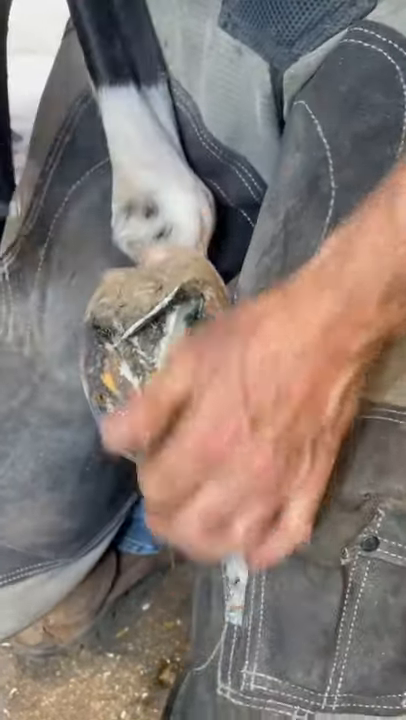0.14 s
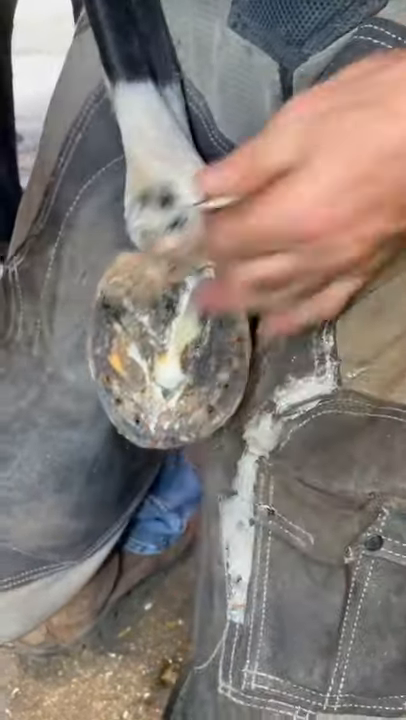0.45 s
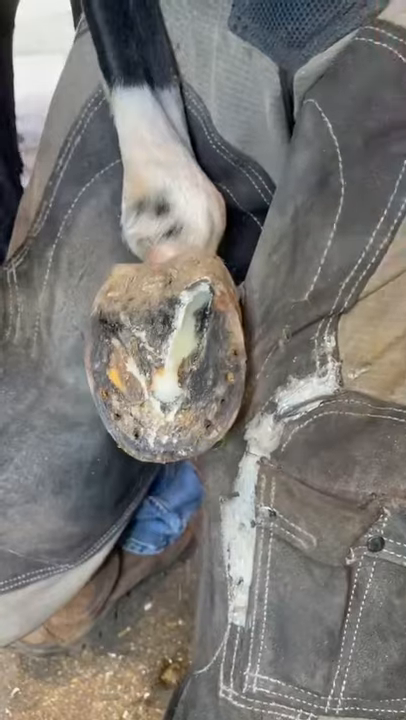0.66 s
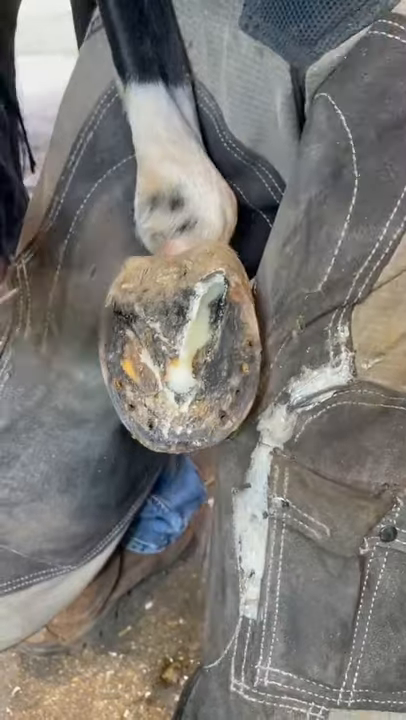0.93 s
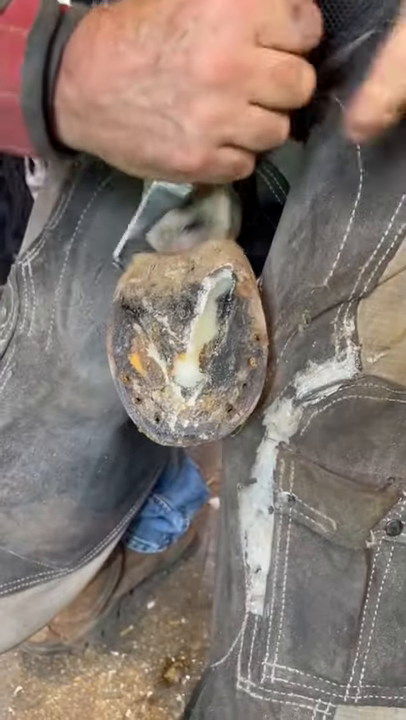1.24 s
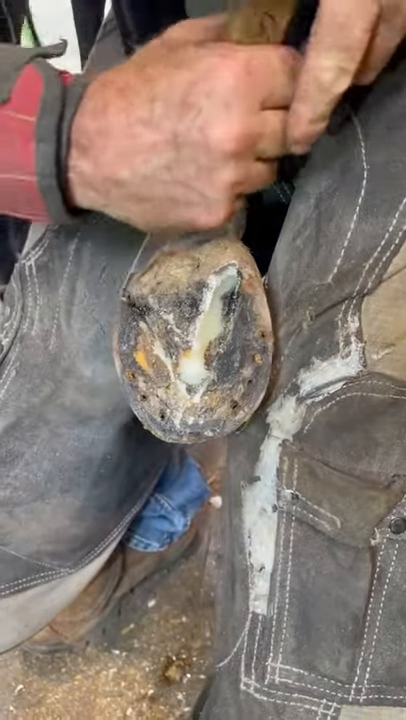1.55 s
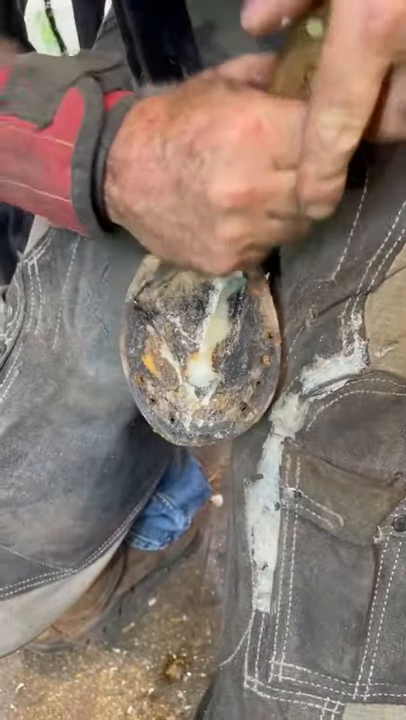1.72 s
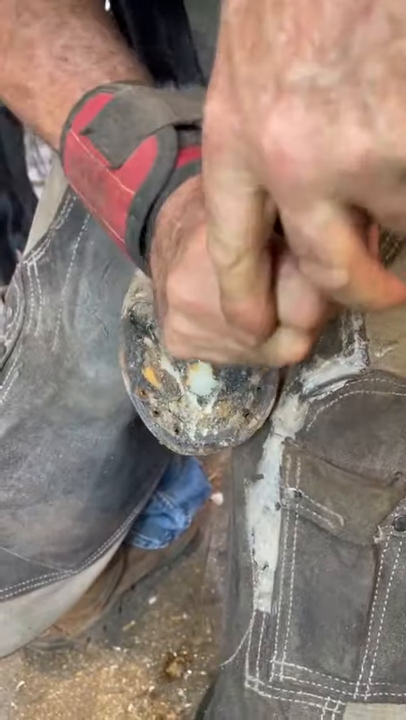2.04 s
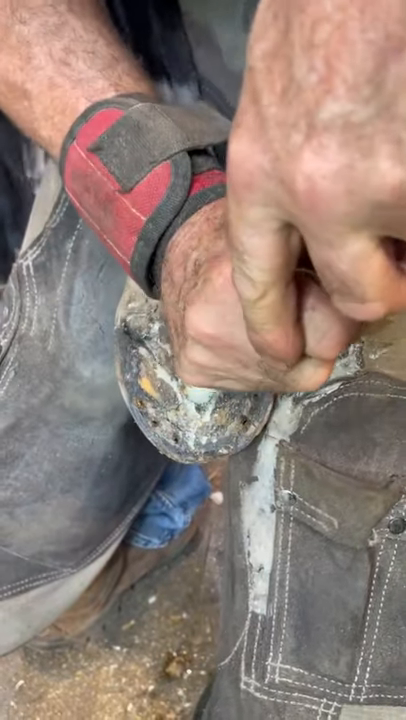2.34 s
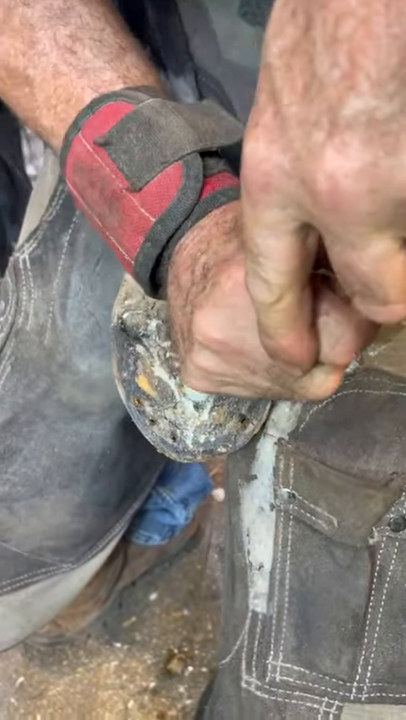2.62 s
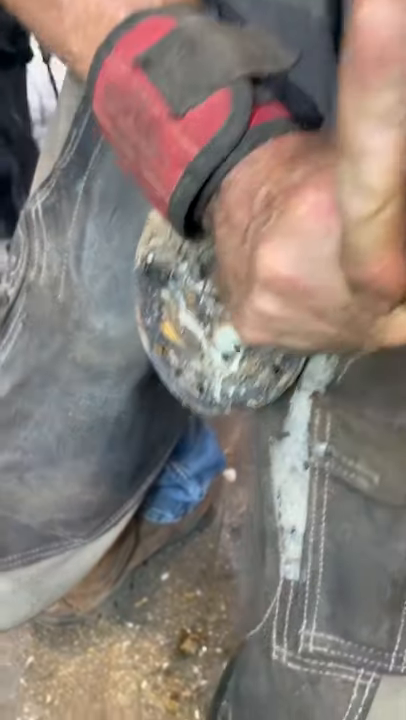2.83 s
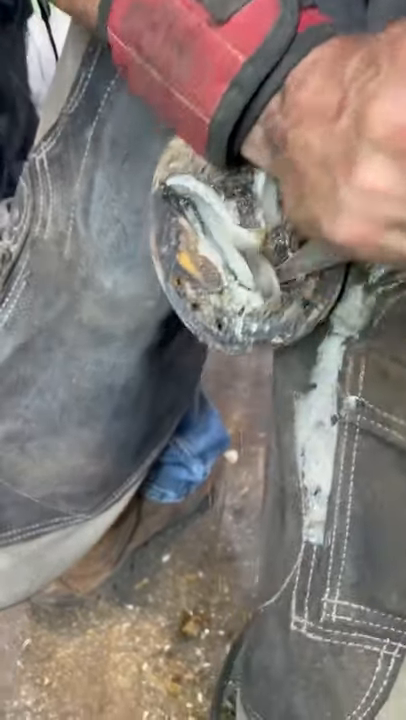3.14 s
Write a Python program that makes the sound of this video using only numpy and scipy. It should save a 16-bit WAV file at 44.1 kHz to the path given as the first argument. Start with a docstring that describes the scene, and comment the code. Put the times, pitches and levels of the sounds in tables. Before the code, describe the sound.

A knife faintly scrapes a horse's hoof over the steady hum of a fan.

```python
"""A barn with a fan running, where a hoof knife pares a horse's hoof close by. The fan hums on its motor orders
over a steady rush. Two faint thin tones hold steady high above everything. Its draught buffets the microphones
in soft low bumps; there is also one brief knock. Now and then the blade scrapes the horn in gritty strokes and
slips, ringing blade and horn briefly."""
import sys
import numpy as np
from scipy.fft import rfft, irfft, next_fast_len
from scipy.io import wavfile
from scipy.ndimage import uniform_filter1d, map_coordinates

SR = 44100
rng = np.random.default_rng(int(sys.argv[2]) if len(sys.argv) > 2 else 0)


def inscribe(sig):
    """Save sig as 16-bit PCM at rate SR to the path in sys.argv[1].

    A 1-D sig is mono; a 2-D sig holds one channel per row.
    Samples are clipped to [-1, 1] before scaling.
    """
    pcm = np.round(np.clip(np.atleast_2d(sig).T, -1, 1) * 32767)
    wavfile.write(sys.argv[1], SR, pcm.astype(np.int16))


N = 144648
T = np.arange(N) / SR

# steady background rush, with a narrow gap near 9 kHz: f/Hz, relative density/dB
RUSH_SPECTRUM = [(30, -40), (100, -1.5), (200, -3), (280, 0), (420, -4.5), (470, -9.5), (850, -8.5),
                 (1000, -10.5), (2560, -15), (4000, -22.5), (4750, -23), (4900, -36), (5050, -23.5),
                 (7900, -26), (8500, -31), (8750, -53), (9700, -48), (10000, -25.5), (11300, -25.5),
                 (11500, -36), (12000, -33), (12150, -68), (16000, -100)]
# its stereo width: f/Hz, side over mid/dB
RUSH_WIDTH = [(110, -60), (180, -48), (300, -16.5), (400, -12.5), (640, -8.5), (1170, -8), (1500, -11),
              (1900, -18), (2300, -11), (3820, -5), (8000, -7.5), (8700, -18), (9700, -20), (10000, -5),
              (11500, -7), (11900, -14)]
# weaker motor orders: order, level/dB, waver/dB
HUM_ORDERS = [(1, -50, 6), (3, -52.5, 4.5), (5, -50, 4.5), (6, -51.5, 2), (7, -54.5, 5), (9, -58.5, 1.5),
              (11, -62, 5), (13, -61, 2)]
# strongest orders, before DRONE_GAIN_DB: t/s, order 2 level/dB, order 4 level/dB
DRONE_LEVELS = [(0.0, -50, -48.5), (0.15, -48.5, -45.5), (0.41, -46, -45), (0.59, -43.5, -49.5),
                (0.88, -49.5, -46.5), (1.34, -42, -49.5), (1.47, -39, -48), (1.74, -37.5, -48.5),
                (1.88, -38, -46.5), (2.16, -39.5, -40.5), (2.27, -44.5, -42.5), (2.47, -45, -42.5),
                (2.97, -42, -41), (3.28, -54, -49)]
# thin tones: f/Hz, level before panning/dB, end/s
WHINE_TONES = [(9819, -68.5, 3.3), (8441, -68, .75)]
# turbulence envelope: t/s, level/dB
DRAUGHT_LEVELS = [(0.0, -66), (0.32, -64), (0.5, -54), (0.71, -49), (0.86, -44), (0.94, -37), (1.07, -44),
                  (1.17, -50), (1.3, -52), (1.45, -50), (1.64, -54), (1.97, -34), (2.28, -45), (2.54, -43),
                  (2.71, -42), (3.11, -34), (3.22, -41), (3.28, -36)]
# turbulence spectrum: f/Hz, relative density/dB
BUFFET_SPECTRUM = [(15, -42), (30, 11), (60, 8), (120, 2), (200, -9), (350, -19), (600, -82), (1500, -120)]
# soft low bumps and one brief knock (near 0.97 s): t/s, peak/dB, f/Hz, half-height width/s
BUMPS_AND_KNOCK = [(0.717, -26, 65, 0.012), (0.746, -22, 70.5, 0.018), (.742, -32, 190, 0.012),
                   (0.767, -24, 74.5, 0.019), (0.899, -21.5, 101, 0.016), (0.922, -20.5, 113, 0.021),
                   (0.967, -32, 359, 0.021), (.97, -33.5, 503, 0.0067), (1.054, -31.5, 75, 0.016),
                   (1.084, -25.5, 120, 0.012), (1.1, -34, 200, 0.0086), (1.114, -23, 73, 0.023),
                   (1.322, -28, 85, 0.012), (1.34, -33, 65, 0.013), (1.396, -35, 95, 0.012),
                   (1.415, -34, 65, .016), (1.44, -43, 60, 0.019), (1.846, -23.5, 58, 0.037),
                   (1.909, -24.5, 116, 0.015), (1.98, -24.5, 109, 0.015), (1.975, -34, 203, 0.043),
                   (2.034, -30, 90, 0.012), (2.108, -28.5, 86, 0.017), (2.256, -30, 80, 0.012),
                   (2.596, -25, 75, 0.012), (2.635, -30, 79.4, 0.011), (2.667, -29, 85.5, 0.026),
                   (2.739, -24, 99, 0.014), (2.788, -28, 104, 0.025), (2.815, -31.5, 113, 0.034),
                   (2.857, -32, 47.6, 0.038), (2.998, -24.5, 138, 0.034), (3.02, -21.5, 149, 0.012),
                   (3.036, -18, 188, 0.014), (3.047, -21.5, 280, 0.011), (3.057, -13, 79.5, 0.01),
                   (3.074, -21, 55, .014), (3.102, -20, 72, 0.026), (3.141, -27.5, 69, 0.036),
                   (3.157, -22, 124, 0.039), (3.195, -22, 79.4, 0.018), (3.24, -24.5, 75, 0.015)]
# ragged edge of a bump: f/Hz, relative density/dB
PUFF_SPECTRUM = [(30, -42), (100, 3), (200, -7), (330, -13.5), (600, -24), (1500, -120)]
# spells of unequal air at the two microphone ports: start/s, end/s, side gain/dB
PORT_SPELLS = [(.66, 0.842, -18), (1.761, 2.126, -9.5), (2.195, 2.62, -15), (2.622, 2.997, -12),
               (3.014, 3.3, -5.5)]
# air unequal between the ports: f/Hz, relative density/dB
PORT_SPECTRUM = [(15, -40), (35, -10), (60, 4), (130, 0.5), (240, -11.5), (400, -18), (600, -40),
                 (1500, -120)]
# knife strokes: t/s, half-height width/s, level/dB, tilt/(dB/oct), horn resonance/Hz, lift/dB
STROKES = [(.4342, .0025, -39, .5, 13500, 12), (.455, .05, -50, 1.5, 6800, 3), (.83, .05, -63, 1, 10500, 4),
           (1.84, .012, -47, 1, 8000, 6), (1.852, .034, -45, -1, 4400, 6), (1.854, .012, -46, -1, 2700, 8),
           (2.69, .04, -50, -5, 1400, 10), (2.72, .05, -63, 0, 9000, 5), (2.875, .03, -52, -3, 2400, 8),
           (2.9, .04, -46, -3, 1300, 16), (2.906, .012, -47, 3, 11000, 4), (2.926, .026, -44, 0, 6200, 9),
           (2.93, .025, -45, -3, 1400, 14), (2.947, .02, -50, -3, 1800, 12),
           (3.189, .01, -49, -1, 3300, 10), (3.201, .018, -41, -1, 3400, 12),
           (3.199, .016, -43, -3, 1950, 12), (3.217, .016, -46, -2, 3000, 6), (3.23, .018, -45, 0, 6900, 3),
           (3.23, .016, -41, -3, 2300, 6)]
# horn grit spectrum: f/Hz, relative density/dB
GRIT_SPECTRUM = [(200, -40), (500, -27), (1200, -3.5), (3000, -3), (5000, -7), (7000, -4), (9000, -9.5),
                 (11000, -2), (12500, -18), (13500, -25), (15500, -38)]
# blade slips: t/s, gain/dB, favoured f/Hz, pitch factor, ring time factor
BLADE_SLIPS = [(0.4334, -19, 2800, 1.08, 0.38), (1.8466, -29, 1300, .99, 0.97),
               (1.8458, -23, 4600, 1.01, 1.2), (1.8515, -25, 2820, 1, 0.98),
               (1.8528, -30.5, 1300, 0.92, 0.86), (1.858, -29.5, 1300, 1.03, .8),
               (2.907, -32, 1300, 0.84, 0.76), (2.917, -31, 1300, 1.04, 0.69),
               (2.9212, -30, 1300, 0.94, 0.64), (2.925, -33, 1300, 1.07, .6), (2.928, -27, 1300, 0.96, .8),
               (2.935, -27.5, 1300, 1.13, 0.75), (2.943, -35, 1300, 1.2, .6),
               (3.194, -23.5, 3400, 1.04, 0.78), (3.1945, -25, 2200, 0.88, 1), (3.2, -27, 2200, 0.9, 0.77),
               (3.207, -28, 3400, 1, .6), (3.2245, -27, 2870, 1.02, .8), (3.226, -33.5, 1310, 1.14, .8),
               (3.227, -30, 6850, 1, 1), (3.2335, -31, 1300, 1.15, 0.55)]
# nominal modes of blade and horn: f/Hz, level/dB, t60/s
BLADE_MODES = [(1290, 2, 0.018), (2170, -7, 0.014), (2870, -6, 0.012), (3400, -4.5, 0.017),
               (4370, -5, 0.0075), (5100, -6, 0.0069), (6850, -9, .009), (8360, -9, 0.0071),
               (10900, -18, .004)]

RUSH_DB = -41.5
SHAFT_HZ, DRONE_GAIN_DB = 59.14, 2
PUFF_DB = -12.5  # rms re bump envelope
GRAINS_PER_S, RESONANCE_OCT = 9000, 0.25
SIDE_LAG_S, SIDE_DB = 0.021, -9.5
FAVOUR_DB_PER_OCT, ATTACK_S = 20, 0.0006
RASP_DEPTH, RASP_PER_S = 0.25, 1500
LOW_HZ, TOP_HZ = 39.7, 15650


def amp(db):
    return 10 ** (np.asarray(db) / 20)


def unit_rms(x):
    return x / np.sqrt(np.mean(x ** 2) + 1e-20)


def db_at(points, hz):
    """Interpolate (f/Hz, level/dB) points over log frequency."""
    f, db = np.transpose(points)
    return np.interp(np.log(hz + 1), np.log(f + 1), db)


def curves(rows):
    """One value per sample for each column after the time."""
    times_s, *columns = np.transpose(rows)
    return [np.interp(T, times_s, column) for column in columns]


def wobble(knots_per_s):
    """Smooth random curve, rms near 1."""
    return map_coordinates(rng.standard_normal(int(N * knots_per_s / SR) + 4), [T * knots_per_s])


def pulse(at_s, width_s):
    """Gaussian envelope, width_s wide at half height."""
    return np.exp(-np.log(2) * (2 * (T - at_s) / width_s) ** 2)


def filtered(x, gain_at_hz):
    size = next_fast_len(N + SR // 2)
    return irfft(rfft(x, size) * gain_at_hz(np.fft.rfftfreq(size, 1 / SR)), size)[..., :N]


def noise(spectrum):
    return unit_rms(filtered(rng.standard_normal(N), lambda hz: amp(db_at(spectrum, hz))))


def stereo(mid, side):
    return np.array([mid + side, mid - side])


def rush():
    """Steady background noise, near mono in the bass, wider above."""
    white = rng.standard_normal((2, N))
    mid = filtered(white[0], lambda hz: amp(db_at(RUSH_SPECTRUM, hz)))
    side = filtered(white[1], lambda hz: amp(db_at(RUSH_SPECTRUM, hz) + db_at(RUSH_WIDTH, hz)))
    flutter_db = 0.3 * wobble(5) + 0.4 * wobble(25)
    return amp(RUSH_DB + flutter_db) * stereo(mid, side) / mid.std()


def fan_motor():
    """Orders of a slightly unsteady shaft, each wavering in level and phase."""
    turns = np.cumsum(SHAFT_HZ + 0.15 * wobble(2.978)) / SR

    def tone(order, db, jitter_rad):
        phase = 2 * np.pi * order * turns + jitter_rad * wobble(12) + 7 * rng.random()
        return np.sqrt(2) * amp(db) * np.sin(phase)

    hum = sum(tone(order, db + waver_db * wobble(9), jitter_rad=0.24 * order)
              for order, db, waver_db in HUM_ORDERS)
    second_db, fourth_db = curves(DRONE_LEVELS)
    second = tone(2, second_db + 0.5 * wobble(9.54), jitter_rad=0.91)
    fourth = tone(4, fourth_db + 2 * wobble(7.99), jitter_rad=0.4)
    return hum + amp(DRONE_GAIN_DB) * (second + fourth)


def whines():
    """Thin steady tones, each fading over the 20 ms before its end."""
    return sum(np.sqrt(2) * amp(db) * np.clip((end_s - T) / 0.02, 0, 1) * np.sin(2 * np.pi * hz * T)
               for hz, db, end_s in WHINE_TONES)


def draught_and_knock():
    """Low turbulence, at times unequal at the two ports, with soft low bumps and one brief knock."""
    level = amp(curves(DRAUGHT_LEVELS)[0])
    buffet = level * unit_rms(amp(3 * wobble(20)) * noise(BUFFET_SPECTRUM))
    bumps, swell = np.zeros((2, N))
    for at_s, db, hz, width_s in BUMPS_AND_KNOCK:
        envelope = amp(db) * pulse(at_s, width_s)
        bumps += envelope * np.sin(2 * np.pi * (hz * (T - at_s) + rng.random()))
        swell += envelope
    puffs = amp(PUFF_DB) * swell * noise(PUFF_SPECTRUM)
    spells = sum(amp(db) * ((T > start_s) & (T <= end_s)) for start_s, end_s, db in PORT_SPELLS)
    side = uniform_filter1d(spells, size=900) * (level + 0.23 * swell) * noise(PORT_SPECTRUM)
    return stereo(buffet + bumps + puffs, side)


def knife_scrapes():
    """Dense grit under rounded strokes, each with one horn resonance; the side signal lags."""
    out = np.zeros((2, N))
    for at_s, width_s, db, tilt_db_per_oct, horn_hz, lift_db in STROKES:
        def colour(hz):
            tilt_db = tilt_db_per_oct * np.log2((hz + 1) / 4000)
            horn_db = lift_db * np.exp(-(np.log2((hz + 1) / horn_hz) / RESONANCE_OCT) ** 2)
            return amp(db_at(GRIT_SPECTRUM, hz) + tilt_db + horn_db)

        grains = (rng.random((2, N)) < GRAINS_PER_S / SR) * rng.standard_normal((2, N))
        hiss = 0.054 * rng.standard_normal((2, N))
        grit = amp(db) * unit_rms(filtered(grains + hiss, colour))
        mid = pulse(at_s, width_s) * grit[0]
        side = amp(SIDE_DB) * pulse(at_s + SIDE_LAG_S, width_s) * grit[1]
        out += stereo(mid, side)
    return out


def knife_slips():
    """Each slip rings blade and horn with a fast flutter, favouring the modes near one pitch."""
    out, t = np.zeros(N + SR), T[:SR // 30]
    for at_s, gain_db, favoured_hz, pitch_factor, time_factor in BLADE_SLIPS:
        ring = np.zeros(len(t))
        for hz, mode_db, t60_s in BLADE_MODES:
            scatter_db, detune = rng.standard_normal(2) * [2, 0.0066]
            favour_db = -FAVOUR_DB_PER_OCT * abs(np.log2(hz / favoured_hz))
            decay_db = -60 * t / (t60_s * time_factor)
            mode = np.sin(2 * np.pi * hz * pitch_factor * (1 + detune) * t)
            ring += amp(mode_db + favour_db + scatter_db + decay_db) * mode
        attack = 1 - np.exp(-t / (ATTACK_S * time_factor))
        out[round(at_s * SR):][:len(t)] += amp(gain_db) * attack * ring
    return out[:N] * (1 + RASP_DEPTH * wobble(RASP_PER_S))


def scene():
    whine_pan, slip_pan = amp([[-3], [2.5]]), amp([[-0.5], [0.5]])  # left, right
    background = fan_motor() + rush() + whine_pan * whines() + draught_and_knock()
    return background + knife_scrapes() + slip_pan * knife_slips()


def record(dry):
    """Microphone bass roll-off, 24 dB/oct, and a hard upper band limit."""
    return filtered(dry, lambda hz: (hz < TOP_HZ) / np.sqrt(1 + (LOW_HZ / (hz + 1)) ** 8))


dry = scene()
out = record(dry)
inscribe(out)
```